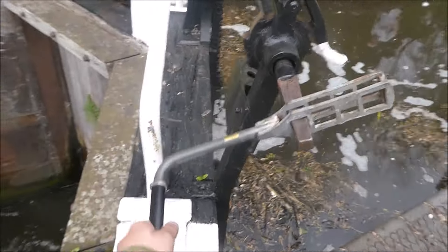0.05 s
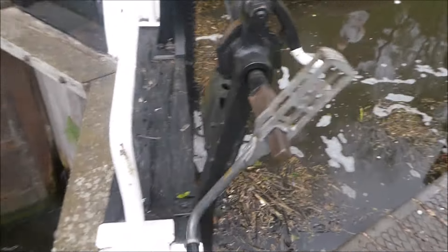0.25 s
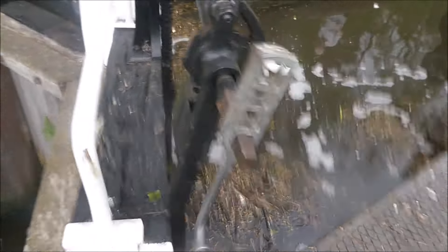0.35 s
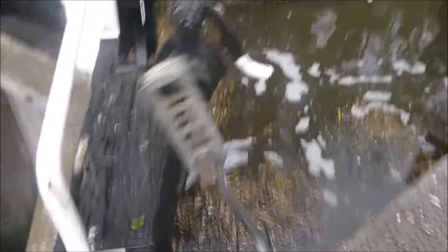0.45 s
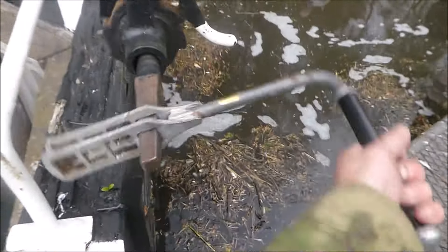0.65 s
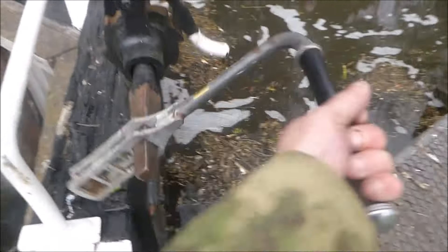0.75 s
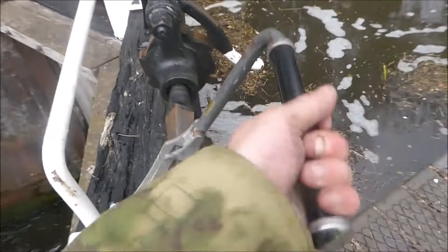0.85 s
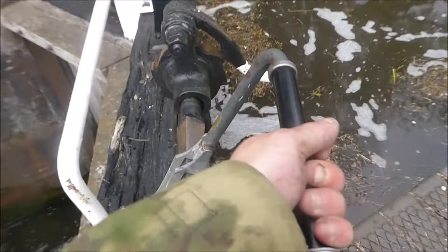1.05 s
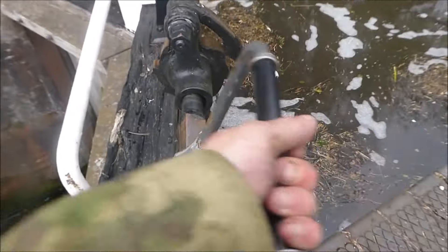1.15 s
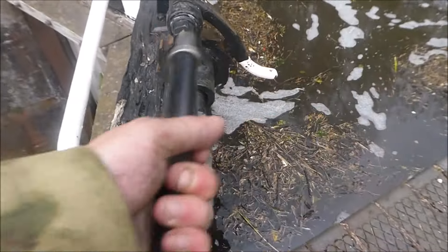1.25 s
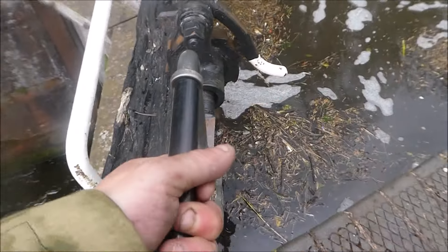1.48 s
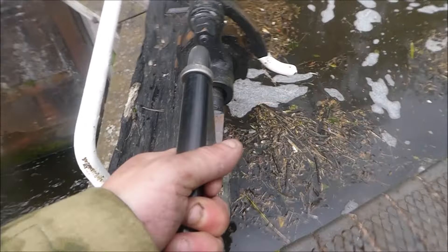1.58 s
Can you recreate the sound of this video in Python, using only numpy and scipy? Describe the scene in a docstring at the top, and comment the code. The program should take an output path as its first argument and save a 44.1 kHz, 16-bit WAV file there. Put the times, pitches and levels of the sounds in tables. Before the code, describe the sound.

Steel ratchet clicks from a hand-wound canal lock gear, heard close and dry outdoors. Sharp, double-edged clacks with short metallic ring and iron clank fall at about 0.2, 0.5, 0.63, 0.76 and 0.88 seconds, with small rebounds between. Dull timber knocks follow, strongest around 0.8 to 1.0. After a lull, a last click lands at 1.3. Low gear rumble and soft steady water hiss continue underneath.

```python
"""Outdoors at a canal lock, a crank winds the gear: the steel pawl drops unevenly over ratchet teeth and rebounds.
Each contact is a noise crack, decaying sine modes of pawl and toothed wheel, and a clank of the iron frame.
The turning gears are low noise with an uneven level, with dull noise knocks in the timber gate.
Water is a soft noise hiss behind; a close microphone pair hears it all, the right one weak in the bass."""
import sys
import numpy as np
from scipy.fft import rfft, irfft, next_fast_len
from scipy.io import wavfile
from scipy.ndimage import map_coordinates

SR = 44100
rng = np.random.default_rng(int(sys.argv[2]) if len(sys.argv) > 2 else 0)


def int16_out(signal):
    """Quantize to a 16-bit WAV file."""
    q = np.round(np.clip(np.atleast_2d(signal).T, -1, 1) * 32767)
    wavfile.write(sys.argv[1], SR, q.astype(np.int16))


N = 70560


def ratchet():
    """The pawl strikes and rebounds: each contact sounds the tooth, the pawl, the wheel and the frame at once."""
    # pawl contacts: start_s, pawl_level_db, wheel_level_db, crack_level_db, clank_level_db,
    # brightness_db_per_octave
    contacts = [ (0.2153, -23.5, -40.5, -31.5, -30.5, -3.5), (0.223, -36, -58, -40, -39.5, 8),
                (.2540, -68, -47, -54, -44.5, 1), (0.265, -66, -47.5, -52, -49, 1),
                (0.4784, -45, -27.5, -23, -31, -4.5), (0.4816, -39, -24.5, -25.5, -32.5, 5.5),
                (0.4894, -36.5, -58, -42, -36, 4), (.5130, -60, -39, -35, -42.5, 4.5),
                (.6340, -26.5, -25.5, -24.5, -35.5, -2), (0.6362, -30.5, -32, -24.5, -35, 3),
                (0.6758, -66, -36, -35, -40.5, -0.5), (0.7242, -57, -52, -37, -37.5, -5),
                (0.7282, -62, -63, -37, -42, -7), (.7570, -18.5, -39, -28.5, -33.5, -6.5),
                (0.7652, -54, -31, -24, -37.5, -2), (.7790, -35.5, -51, -43, -34.5, 0),
                (0.787, -54, -30.5, -32, -40, 1), (.8200, -60, -42, -52, -40.5, -7.5),
                (0.8772, -19.5, -37.5, -24, -32, -2.5), (.8870, -26.5, -33, -46, -58, 5.5),
                (.9010, -62, -32, -42, -41, -1.5), (0.997, -80, -73, -62, -43.5, -7),
                (1.3105, -35, -31.5, -27.5, -35, -7), (1.3125, -40, -26.5, -30, -35.5, 1.5),
                (1.3180, -36, -54, -35, -38, 7.5), (1.3590, -70, -61, -52, -52, 9),
                (1.3850, -70, -51, -58, -56, -10)]
    out = np.zeros((2, N))
    for start_s, pawl_db, wheel_db, crack_db, clank_db, brightness in contacts:
        contact = amp(crack_db) * tooth_crack(brightness)
        contact += amp(pawl_db) * pawl_ring(brightness)
        contact += amp(wheel_db) * wheel_ring(brightness)
        contact += amp(clank_db) * frame_clank()
        add(out, start_s, contact)
    return out


def tooth_crack(brightness):
    """Steel meets a tooth: a very short noise burst, brighter for a harder contact."""
    # spectrum shape of the crack: frequency_hz, relative_level_db
    crack = [(300, -27.5), (1200, -9), (3000, -4), (4700, -2), (6200, -1.5), (8300, -7.5), (10500, -8.5),
             (12500, -9.5), (14800, -22), (16000, -35)]
    return burst(lambda hz: along(crack, hz) + tilt(brightness, hz), attack_s=0.00028, t60_s=0.017)


def pawl_ring(brightness):
    """The steel pawl rings in its own modes."""
    # modes of the pawl: pitch_hz, level_db, t60_s
    pawl = [(2896, -19, .14), (5585, -1.5, .062), (5800, -3, .018), (6130, -11, .022), (9640, -11, .03),
            (9782, -6, .06), (10215, -14.5, .06), (14300, -24, .055)]
    return ring(pawl, brightness=brightness)


def wheel_ring(brightness):
    """The struck ratchet wheel rings in its own modes."""
    # modes of the ratchet wheel: pitch_hz, level_db, t60_s
    wheel = [(1779, -17, .15), (3804, -2, .11), (3850, -10, .12), (5458, -6, .09), (7036, -18, .07),
             (7432, -4.5, .07), (7560, -13, .04), (9106, -14.5, .1), (12385, -22, .08), (12700, -23, .04),
             (14500, -26, .04)]
    return ring(wheel, brightness=brightness)


def frame_clank():
    """The shaken iron frame: lower modes over a dense burst, both swelling more slowly than the crack."""
    # modes of the iron frame: pitch_hz, level_db, t60_s
    frame = [(405, -13, .12), (790, -5, .1), (875, -7, .12), (1124, -3, .1), (1338, -1, .1),
             (2290, -11, .06), (2896, -4, .13), (3150, -11, .05), (3480, -9, .06)]
    # spectrum shape of the clank: frequency_hz, relative_level_db
    clank = [(60, -49), (150, -18), (350, 2), (600, 1.5), (1100, 3), (1700, -4), (3200, -8.5),
             (6500, -11.5), (10000, -28), (16000, -36)]
    attack_s = 0.0037
    return ring(frame, attack_s) + burst(lambda hz: along(clank, hz), attack_s, t60_s=0.11)


def wheel_after_ring():
    """The struck ratchet wheel rings on with two longer, smoother modes."""
    # long rings of the wheel: start_s, level_db
    long_rings = [(0.6354, -38.5), (0.788, -45)]
    # long modes of the ratchet wheel: pitch_hz, level_db, t60_s
    long_modes = [(1779, 1.5, .42), (5458, -5, .3)]
    out = np.zeros((2, N))
    for start_s, level_db in long_rings:
        add(out, start_s, amp(level_db) * ring(long_modes, rough=0.093))
    return out


def gear_rumble():
    """The turning gears rumble: low noise whose level wavers at random around a slow curve."""
    # spectrum shape of the rumble: frequency_hz, relative_level_db
    rumble = [(25, -42), (60, -17.5), (120, -15), (165, -9.5), (215, 2), (400, 1), (650, -5.5), (880, -1),
              (1300, -10.5), (2200, -22), (5000, -60)]
    # slow course of the rumble: time_s, level_db
    rumble_level = [(0, -47.5), (.12, -47), (.4, -44.5), (.65, -44.5), (.85, -45.5), (1.1, -50),
                    (1.25, -48.5), (1.42, -44), (1.6, -49.5)]
    swing_db, swing_per_s = 1, 35
    level_db = curve(rumble_level) + swing_db * wobble(swing_per_s)
    return amp(level_db) * noise(lambda hz: along(rumble, hz))


def gear_knocks():
    """The gearing knocks dully in the timber gate: short bursts centred on a pitch of their own."""
    # knocks of the gearing: start_s, level_db, pitch_hz
    knocks = [(0.104, -41, 222), (.216, -37.5, 390), (0.259, -38.5, 162), (.488, -36, 363),
              (.590, -39, 243), (0.635, -43, 320), (.729, -35, 303), (.765, -40.5, 274),
              (0.788, -28.5, 300), (.880, -31.5, 343), (.999, -31, 332), (1.001, -33, 583),
              (1.026, -38, 190), (1.132, -44, 148), (1.218, -36, 256)]
    # spectrum shape of a knock: multiple_of_pitch (ratio), relative_level_db
    knock = [(.3, -34), (.6, -19.5), (1, 6.5), (1.4, -11), (2.4, -17), (4, -26), (10, -66)]
    out = np.zeros((2, N))
    for start_s, level_db, pitch_hz in knocks:
        thud = burst(lambda hz: along(knock, hz / pitch_hz), attack_s=0.0022, t60_s=0.086)
        add(out, start_s, amp(level_db) * thud)
    return out


def water(flutter_db=0.1, flutter_per_s=60):
    """Water running at the lock: a soft broad hiss that drifts slowly and barely flutters."""
    # spectrum shape of the water: frequency_hz, relative_level_db
    hiss = [(40, -26), (200, -10.5), (900, 5.5), (1600, 4), (2400, -0.5), (5000, -2.5), (7600, -6.5),
            (9800, -3), (12500, -6), (15000, -10.5), (15800, -45)]
    # slow course of the water: time_s, level_db
    water_level = [(0, -49.5), (.4, -49), (.85, -52), (1.1, -53.5), (1.3, -52), (1.6, -51.5)]
    level_db = curve(water_level) + flutter_db * wobble(flutter_per_s)
    return amp(level_db) * noise(lambda hz: along(hiss, hz))


def ring(modes, attack_s=0.00015, rough=0.36, brightness=0):
    """One blow on a set of modes, a little different each time and roughened by the chatter of the contact."""
    scatter_db, rough_per_s = 2.5, 295
    t = np.arange(SR // 4) / SR
    out = np.zeros(len(t))
    for pitch_hz, level_db, t60_s in modes:
        mode_db = level_db + tilt(brightness, pitch_hz) + scatter_db * rng.standard_normal()
        chatter = rough * wobble(rough_per_s, size=len(t))  # radians
        phase = 2 * np.pi * (pitch_hz * t + rng.random()) + chatter
        out += amp(mode_db) * blow(t, attack_s, t60_s) * np.sin(phase)
    return out


def burst(colour_db, attack_s, t60_s):
    """Dense short resonances: coloured noise that swells and dies."""
    t = np.arange(SR // 4) / SR
    return blow(t, attack_s, t60_s) * noise(colour_db, size=len(t))


def blow(t, attack_s, t60_s):
    """A fast rise and an exponential decay from t = 0, losing 60 dB in t60_s."""
    t = np.maximum(t, 0)
    rise = 1 - np.exp(-t / attack_s)
    return rise * np.exp(-np.log(1000) * t / t60_s)


def tilt(brightness, hz):
    """A harder contact excites more treble: dB around a 5 kHz pivot, level below a tenth of it."""
    pivot_hz = 5000
    return brightness * np.log2(np.maximum(hz, pivot_hz / 10) / pivot_hz)


def noise(colour_db, size=N):
    """Noise of rms 1 coloured by a function of frequency, partly alike at the two microphones."""
    # likeness of the two microphones: frequency_hz, correlation (-1 to 1)
    alike = [(40, 0.11), (200, 0.95), (450, 0.75), (800, 0.78), (2000, 0.9), (5000, 0.38), (10000, 0.71),
             (15000, 0.42)]

    def mid_side(hz):
        turn = np.arccos(np.clip(along(alike, hz), -1, 1)) / 2
        return amp(colour_db(hz)) * np.array([np.cos(turn), np.sin(turn)])

    mid, side = filtered(rng.standard_normal((2, size)), mid_side)
    pair = np.array([mid + side, mid - side])
    return pair / pair.std()


def wobble(rate, size=N):
    """A smooth random curve, rate knots a second."""
    knots = rng.standard_normal(512)
    return map_coordinates(knots, [np.arange(size) * rate / SR], mode="wrap")


def filtered(x, response):
    """x through a complex response of frequency."""
    size = x.shape[-1]
    padded = next_fast_len(size + 2048)
    spectrum = rfft(x, padded) * response(np.fft.rfftfreq(padded, 1 / SR))
    return irfft(spectrum, padded)[..., :size]


def amp(db):
    """Decibels to gain."""
    return 10 ** (np.asarray(db) / 20)


def along(points, hz):
    """Read (frequency, value) points on a log axis."""
    f, v = np.transpose(points)
    return np.interp(np.log(hz + 1), np.log(f + 1), v)


def curve(rows):
    """(time_s, value) rows as one value per sample."""
    return np.interp(np.arange(N) / SR, *np.transpose(rows))


def add(out, start_s, sound):
    """Mix a sound in at a time, cut off at the end of the scene."""
    part = out[:, round(start_s * SR):][:, :sound.shape[-1]]
    part += sound[..., :part.shape[1]]


def scene():
    """Ratchet, gears and water together."""
    return ratchet() + wheel_after_ring() + gear_rumble() + gear_knocks() + water()


def record(dry):
    """The right microphone is weak in the bass and out of step with the left; a low cut and a band limit follow."""
    # right microphone below the left: frequency_hz, loss_db
    right_loss = [(60, 11.5), (130, 11), (330, 16.5), (430, 22.5), (620, 12.5), (1000, 5), (1700, 0.5),
                  (5500, 0.2), (10000, 2.5), (14500, 5.5)]
    # right microphone ahead of the left: frequency_hz, lead_radians
    right_lead = [(340, -1.5), (420, 0), (490, 4), (700, 3), (1600, 2.5), (3800, 2.0556), (6500, 1.34),
                  (11000, 1.09)]
    low_cut_hz, top_hz = 83, 15900

    def right_response(hz):
        return amp(-along(right_loss, hz)) * np.exp(1j * along(right_lead, hz))

    def band(hz):
        low_cut = 1j * hz / (low_cut_hz + 1j * hz)
        return low_cut * (hz < top_hz)

    pair = np.array([dry[0], filtered(dry[1], right_response)])
    return filtered(pair, band)


dry = scene()
out = record(dry)
int16_out(out)
```